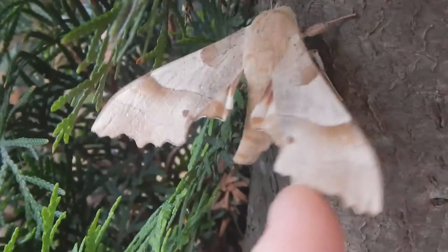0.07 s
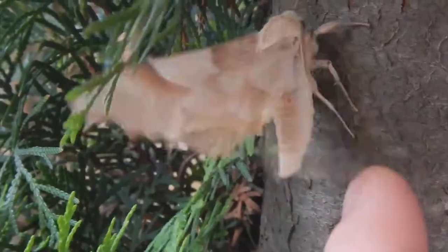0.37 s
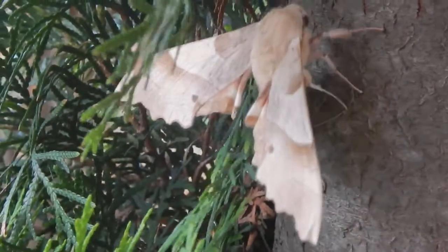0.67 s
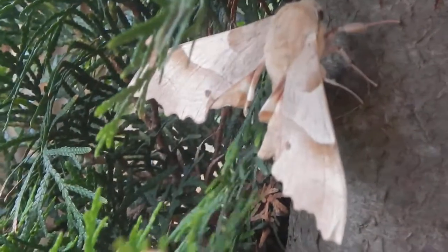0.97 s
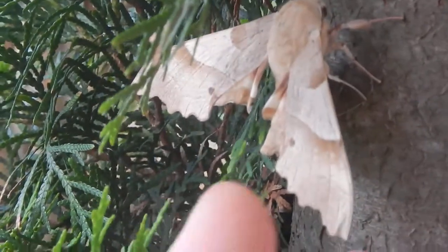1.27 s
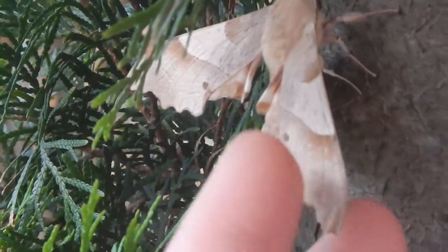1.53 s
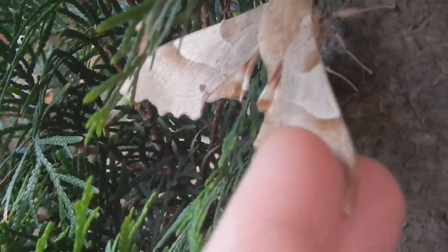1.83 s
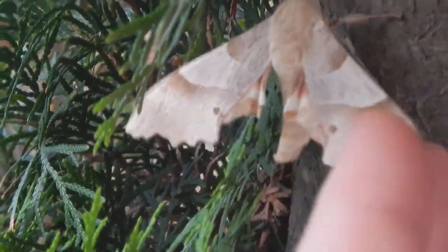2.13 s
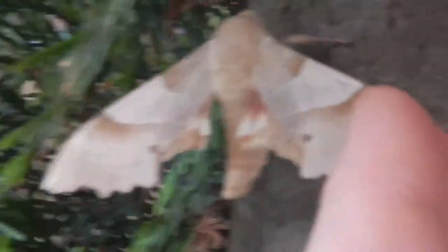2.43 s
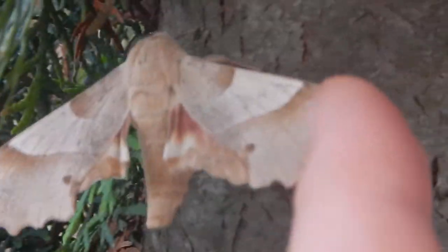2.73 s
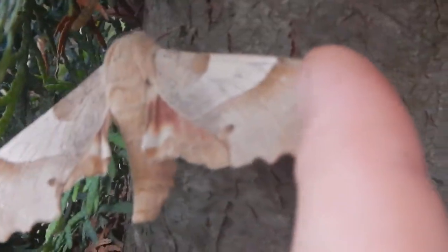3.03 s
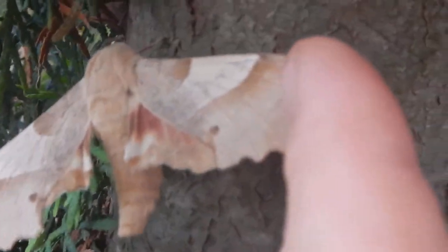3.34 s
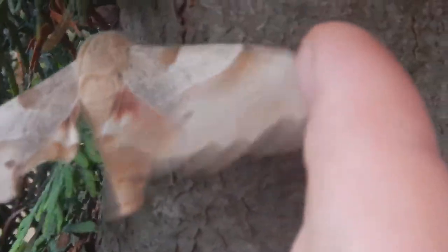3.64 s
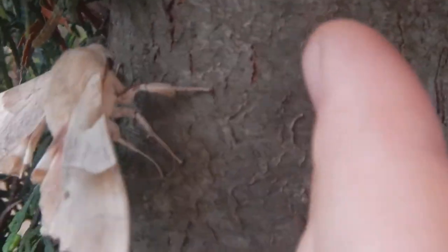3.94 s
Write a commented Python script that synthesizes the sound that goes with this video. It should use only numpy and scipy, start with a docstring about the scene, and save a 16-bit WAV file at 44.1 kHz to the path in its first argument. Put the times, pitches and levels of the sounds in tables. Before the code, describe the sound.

Short, high, downward chirps come from a nearby bird, roughly a second apart. After the first, leaves rustle briefly and a soft knock sounds near the microphone. Distant twitters and a soft, even hiss of garden air continue throughout.

```python
"""Small bird in a garden

A close bird repeats a sharp, falling chirp, sung by both sides of its syrinx at once; it slaps off
nearby walls and scatters through the leaves. Farther off, other birds twitter in wavering tones
over a steady outdoor hush of shaped noise. Up close, a hand brushes foliage and knocks once."""
import sys
import numpy as np
from scipy import signal
from scipy.fft import rfft, irfft
from scipy.io import wavfile
from scipy.ndimage import map_coordinates

SR = 44100
rng = np.random.default_rng(int(sys.argv[2]) if len(sys.argv) > 2 else 0)


def log_audio(samples):
    """Write samples as a 16-bit WAV file to the path given in sys.argv[1]."""
    # one column per channel
    frames = np.atleast_2d(samples).T
    # limit to full scale, then quantise
    limited = np.clip(frames, -1, 1)
    pcm = np.round(limited * 32767).astype(np.int16)
    wavfile.write(sys.argv[1], SR, pcm)


N = 176400
LEAD = SR // 4  # samples of pre-roll before time zero

# The near bird's cues. Each row: time of the peak in seconds, level in dB, pitch ratio.
CHIRP_CUES = [(-.046, -22.5, 0.98), (1.143, -22.5, 0.98), (2.222, -22.5, 0.99), (3.722, -22.5, 1.0)]
# The chirp's lower voice. Each row: seconds from the peak, pitch in Hz, level in dB against the cue.
LOW_GLIDE = [(-.027, 4000, -23), (-.018, 4380, -14), (-.009, 4345, -19), (-.001, 4240, -11),
             (.007, 3353, -23.5), (.017, 3662, -14), (.028, 2775, -24), (.046, 3230, -16.5),
             (.064, 3095, -19.5), (.076, 2504, -24), (.092, 2300, -32.5)]
# The chirp's upper voice. Each row: seconds from the peak, pitch in Hz, level in dB against the cue.
HIGH_GLIDE = [(-.05, 5600, -25), (-.031, 5650, -20.5), (-.022, 5500, -23), (-.013, 4950, -20.5),
              (-.006, 4660, -9), (.001, 4660, -5), (.007, 4640, -16), (.03, 4520, -19)]
# Slaps off the walls. Each row: delay in seconds, level in dB.
WALL_SLAPS = [(.009, -6), (.017, -8.5), (.031, -6), (.054, -6), (0.072, -10.5)]
# Far birds' notes. Each row: start in seconds, length in seconds, centre pitch in Hz,
# fall as a share of the pitch, level in dB before the dry/wet mix, wobble as a share of the pitch.
FAR_TWITTERS = [(0.063, 0.03, 5570, 0.083, -47, 0.032), (0.072, 0.0753, 4405, .05, -47, 0.039),
                (0.266, 0.051, 5430, .05, -56, 0.03), (0.442, 0.066, 5390, 0.07, -41.5, 0.045),
                (0.514, 0.076, 4750, 0.041, -49, 0.0366), (0.759, 0.048, 4300, .02, -51.5, 0.023),
                (0.793, 0.099, 5020, 0.19, -54.5, 0.06), (1.159, 0.068, 5545, 0.029, -43.5, 0.048),
                (1.261, 0.072, 4930, 0.26, -44.5, 0.077), (1.305, 0.038, 4350, 0.047, -42.5, 0.04),
                (1.724, 0.049, 5400, .1, -47, 0.042), (1.956, 0.12, 5396, 0.02, -46, 0.024),
                (1.99, 0.24, 4665, 0.037, -50.5, 0.034), (2.56, 0.074, 5330, 0.16, -47, 0.02),
                (2.763, 0.091, 5160, .15, -46.5, 0.079), (2.775, 0.068, 6850, .1, -59.5, .03),
                (2.802, 0.12, 5460, 0.019, -41, 0.035), (2.85, 0.11, 4820, 0.067, -46, 0.058),
                (2.914, 0.062, 3060, 0.16, -51, 0.056), (3.359, .17, 4790, .1, -53, .085),
                (3.402, 0.051, 5620, 0, -49.5, 0.015), (3.419, 0.063, 4157, 0.013, -49, 0.0142),
                (3.819, .09, 5370, 0.012, -50.5, 0.018), (3.88, 0.065, 4558, 0.039, -56, 0.03)]
# Soft, flat whistles. Each row: start in seconds, pitch in Hz, level in dB before the dry/wet mix.
FAR_WHISTLES = [(.335, 3482, -53.5), (.675, 3420, -51.5), (0.786, 3340, -52.5), (1.793, 3450, -52),
                (2.63, 3403, -50.5), (3.888, 2404, -50.5)]
# Stereo tilt of all the birds. Each row: frequency in Hz, left over right in dB.
BIRD_TILT = [(3200, 2), (4400, -4.5), (5600, -6), (7000, 3.5)]
# Brushes on foliage. Each row: centre in seconds, bell-curve width in seconds, level in dB,
# left over right in dB.
LEAF_BRUSHES = [(0.22, 0.013, -51, 0), (0.384, .0012, -50, 3), (0.395, 0.004, -46.5, 4),
                (.427, 0.0017, -46.5, -2), (0.441, 0.0027, -39.5, -1), (0.457, .002, -50, 0),
                (0.491, 0.00072, -41.5, 4), (1.54, 0.0021, -55.5, -2)]
# The crisp tone of the leaves. Each row: frequency in Hz, relative level in dB.
LEAF_EQ = [(300, -14), (1200, -20), (2300, 5), (3500, -4), (5200, 9.5), (8000, -6.5), (10000, -29),
           (15000, -50)]
# The dull body of the knock. Each row: frequency in Hz, relative level in dB.
KNOCK_EQ = [(80, -22), (180, -2), (550, -4.5), (1000, -4), (1550, 3.5), (2200, -4.5), (3100, -5),
            (4200, -28), (12000, -46)]
# The tone of the outdoor air. Each row: frequency in Hz, relative level in dB.
HUSH_EQ = [(25, -17), (60, -12.5), (90, -19), (125, -6), (180, 0), (350, -0.5), (750, -4.5), (1100, -2.5),
           (1700, -1.5), (2300, -9), (3000, -7.5), (3800, -15), (5200, -9.5), (6500, -20.5), (7700, -23),
           (8300, -25), (9200, -31.5), (11000, -30), (16000, -34.5)]
# Stereo tilt of the air. Each row: frequency in Hz, left over right in dB.
HUSH_TILT = [(70, -2), (200, 4.5), (1300, 6.5), (3800, 3.5), (7500, 3.5), (11000, 0.5)]

RASP_HZ, RASP_END_S, RASP_FADE_S = 410.4, -0.029, 0.0049  # the buzz that opens a chirp
FRAY_WOBBLE, FRAY_START_S, FRAY_RISE_S = 0.028, 0.059, 0.011  # the pitch frays as a chirp ends
KNOCK_AT_S, KNOCK_DECAY_S, KNOCK_TAIL_S = 0.671, 0.00073, 0.011


def near_bird():
    """The lead: a two-voiced chirp heard directly, off the walls and through the garden, plus one pip."""
    t = clock()
    song = syrinx_voice(LOW_GLIDE, wobble=0.0211, rasp_depth=0)
    song += syrinx_voice(HIGH_GLIDE, wobble=0.02086, rasp_depth=0.15)
    walls = 0
    for delay, db in WALL_SLAPS:
        delayed = np.interp(t - delay, t, song)
        walls += undb(db) * scatter(delayed, t60_s=0.0086, onset_s=0.00024)
    early = undb(0.5) * scatter(song, t60_s=0.21, onset_s=0.0055)
    late = undb(-8.5) * scatter(song, t60_s=0.57, onset_s=0.056)
    dry_pip = bird_note(start=1.381, length=0.015, hz=4360, fall=0.036, db=-43.5,
                        waver=1 + 0.015 * wander(498))
    return pan(db=-3) * (song + dry_pip) + walls + early + late


def syrinx_voice(glide, wobble, rasp_depth):
    """One side of the syrinx: a gliding sine with a faint octave, repeated on every cue."""
    times, hz, db = np.array(glide).T
    waver = 1 + wobble * wander(500)
    buzz = sine(RASP_HZ * (1 + 0.15 * wander(300)))
    jitter = FRAY_WOBBLE * wander(900)
    voice = 0
    for peak, cue_db, ratio in CHIRP_CUES:
        t = clock() - peak
        rasp = rasp_depth * buzz * (1 - np.tanh((t - RASP_END_S) / RASP_FADE_S)) / 2
        fray = jitter * (1 + np.tanh((t - FRAY_START_S) / FRAY_RISE_S))
        pitch = ratio * np.interp(t, times, hz) * (waver + rasp + fray)
        gate = np.clip(np.minimum(t - times[0], times[-1] - t) / 0.008, 0, 1)  # 8 ms fades
        envelope = gate * undb(cue_db + np.interp(t, times, db))
        voice += envelope * (sine(pitch) + undb(-47) * sine(2 * pitch))
    return voice


def scatter(sound, t60_s, onset_s):
    """Diffuse reflections from leaves and walls: a stereo noise tail that builds and dies away."""
    t = np.arange(SR) / SR
    tail = noise(likeness=0.58, size=SR) * np.exp(-np.log(1000) * t / t60_s)
    tail *= 1 - np.exp(-t / onset_s)
    tail /= np.sqrt(np.sum(tail ** 2) / 2)
    return signal.fftconvolve(sound[None], tail, axes=1)[:, :len(sound)]


def far_birds():
    """Raspy twitters and soft whistles, set back by more reverb than direct sound."""
    calls = 0
    for start, length, hz, fall, db, wobble in FAR_TWITTERS:
        core = bird_note(start, length, hz, fall, db, 1 + wobble * wander(450))
        raspy_edge = bird_note(start, length, hz, fall, db - 7, 1 + 2.5 * wobble * wander(900))
        calls += core + raspy_edge
    for start, hz, db in FAR_WHISTLES:
        calls += bird_note(start, length=0.037, hz=hz, fall=0, db=db, waver=1 + 0.0181 * wander(150))
    return undb(-7.5) * calls + undb(-2.5) * scatter(calls, t60_s=0.38, onset_s=0.0006)


def bird_note(start, length, hz, fall, db, waver):
    """One whistled note that swells and fades as its pitch slides down by the share `fall`."""
    progress = np.clip((clock() - start) / length, 0, 1)
    arch = np.sqrt(4 * progress * (1 - progress))
    return undb(db) * arch * sine(hz * (1 - fall * (progress - 0.5)) * waver)


def hand_knock():
    """One dull knock on the left: a snap of noise with a short, softer tail."""
    t = clock()
    age = np.maximum(t - KNOCK_AT_S, 0)
    decay = np.exp(-age / KNOCK_DECAY_S) + undb(-14.5) * np.exp(-age / KNOCK_TAIL_S)
    hit = (t > KNOCK_AT_S) * decay * noise(likeness=0.92)
    return undb(-29) * pan(db=15) * equalise(hit, KNOCK_EQ)


def foliage_brushes():
    """A hand grazes leaves: tiny bursts of bright noise, with a level flutter for crackle."""
    t = clock()
    bursts = sum(undb(db) * pan(side_db) * np.exp(-((t - centre) / width) ** 2 / 2)
                 for centre, width, db, side_db in LEAF_BRUSHES)
    crackle = undb(2 * wander(600))
    return equalise(bursts * crackle * noise(likeness=0.91), LEAF_EQ)


def outdoor_hush():
    """The bed: wide, nearly steady air, leaning left."""
    air = equalise(noise(likeness=0.15), HUSH_EQ)
    return stereo_tilt(air, HUSH_TILT) * undb(-53.5 + 0.6 * wander(7.475))


def undb(db):
    """Decibels to gain."""
    return 10 ** (np.asarray(db) / 20)


def pan(db):
    """Constant-power stereo gains; positive dB is to the left."""
    gains = undb(np.array([[db], [-db]]) / 2)
    return gains / np.sqrt(np.mean(gains ** 2))


def clock():
    """Time of every sample in seconds, pre-roll included."""
    return np.arange(-LEAD, N) / SR


def wander(rate_hz):
    """Smooth random modulation with a spread of about 1."""
    t = np.arange(N + LEAD) / SR
    knots = rng.standard_normal(N // 8)
    return map_coordinates(knots, [t * rate_hz], order=3, mode="mirror")


def noise(likeness, size=N + LEAD):
    """White stereo noise, from fully wide (likeness 0) to mono (1)."""
    white = rng.standard_normal((3, size))
    return np.sqrt(1 - likeness) * white[:2] + np.sqrt(likeness) * white[2]


def sine(hz):
    """A sine that follows a pitch curve."""
    return np.sin(2 * np.pi * np.cumsum(hz) / SR)


def curve_db(points):
    """A smooth-running dB curve across the spectrum, joining the points in log frequency."""
    hz, db = np.array(points).T
    bins_hz = np.maximum(np.fft.rfftfreq(N + LEAD, 1 / SR), 1)
    return np.interp(np.log(bins_hz), np.log(hz), db)


def equalise(sound, points):
    """Shape the spectrum; white noise keeps its level."""
    gain = undb(curve_db(points))
    return irfft(rfft(sound) * gain / np.sqrt(np.mean(gain ** 2)), N + LEAD)


def stereo_tilt(sound, points):
    """Pan each frequency by its own amount."""
    gains = undb(np.array([[0.5], [-0.5]]) * curve_db(points))
    return irfft(rfft(sound) * gains, N + LEAD)


def scene():
    """Birds, hand and air mixed, with the pre-roll trimmed off."""
    birds = stereo_tilt(near_bird() + far_birds(), BIRD_TILT)
    mix = birds + hand_knock() + foliage_brushes() + outdoor_hush()
    return mix[:, LEAD:]


def record(dry):
    """Master EQ: a narrow notch at 2.5 kHz and a steep cut above 15.75 kHz."""
    notched = signal.lfilter(*signal.iirnotch(2500, Q=15, fs=SR), dry)
    high_cut = signal.ellip(10, 0.2, 70, 15750, fs=SR, output="sos")
    return signal.sosfilt(high_cut, notched)


dry = scene()
out = record(dry)
log_audio(out)
```